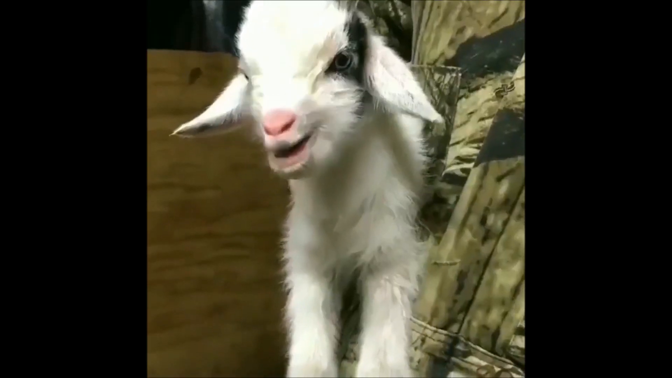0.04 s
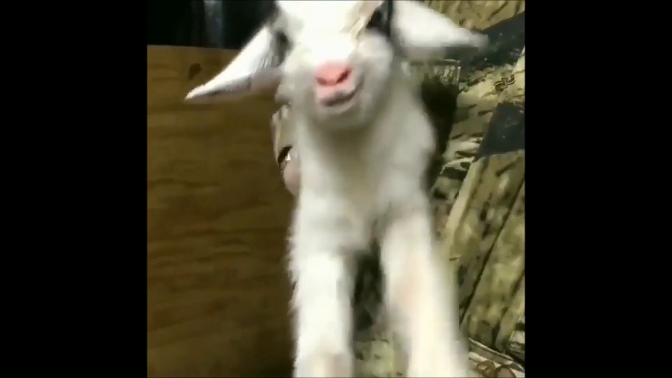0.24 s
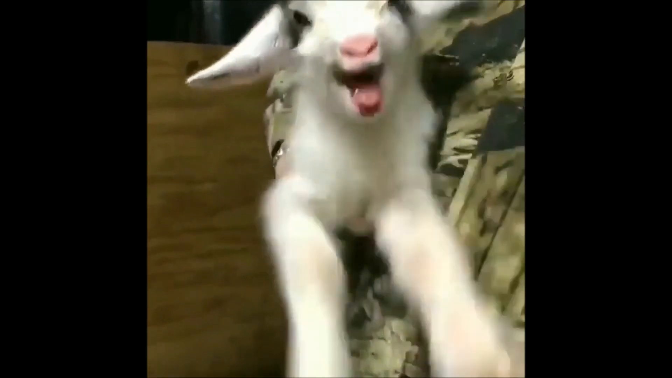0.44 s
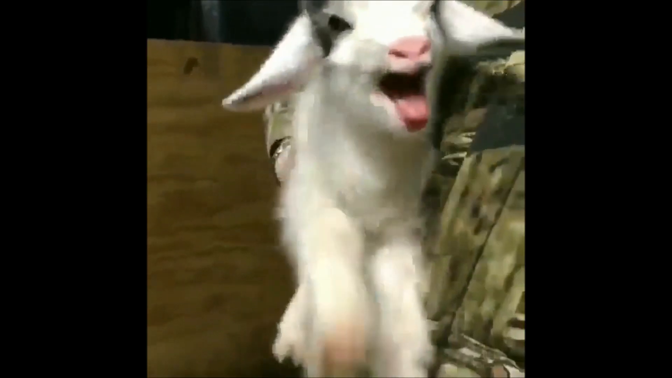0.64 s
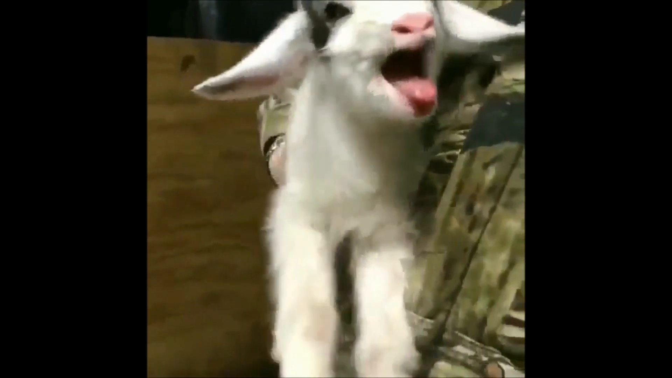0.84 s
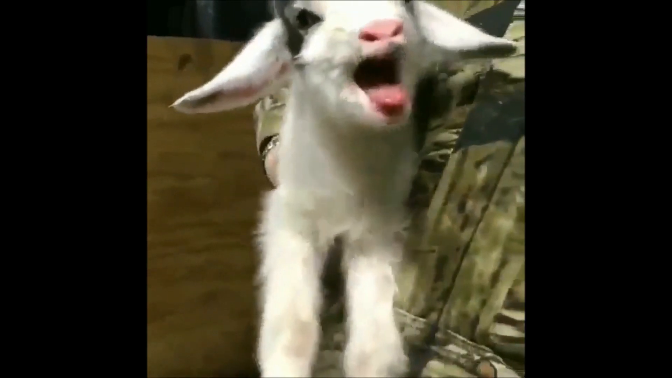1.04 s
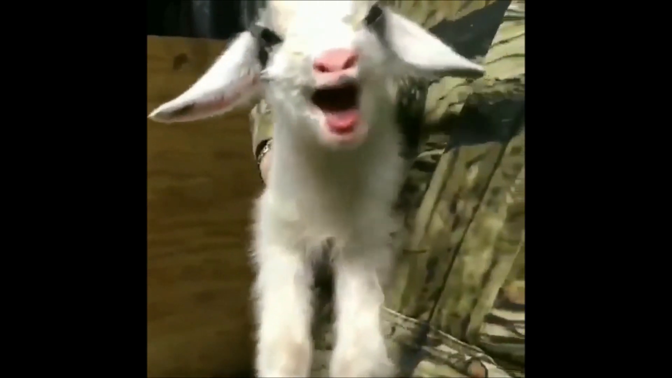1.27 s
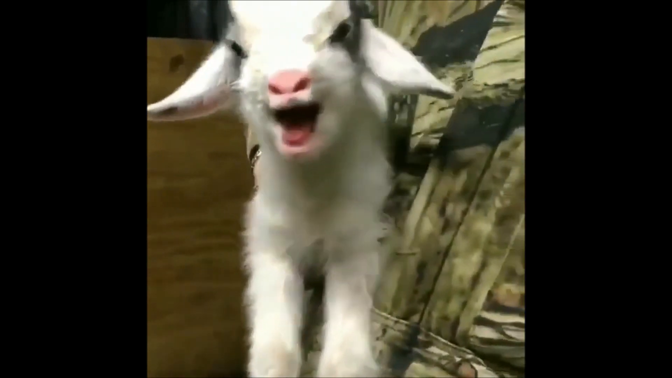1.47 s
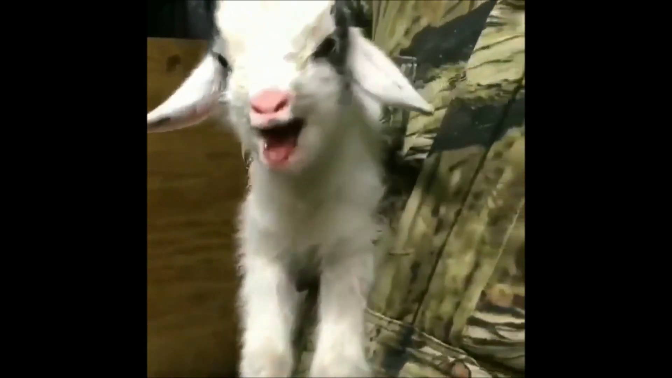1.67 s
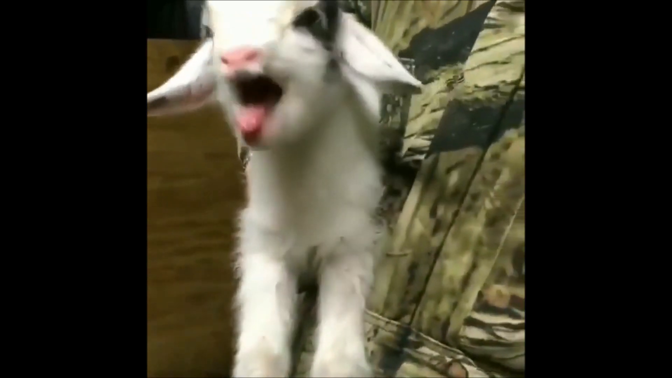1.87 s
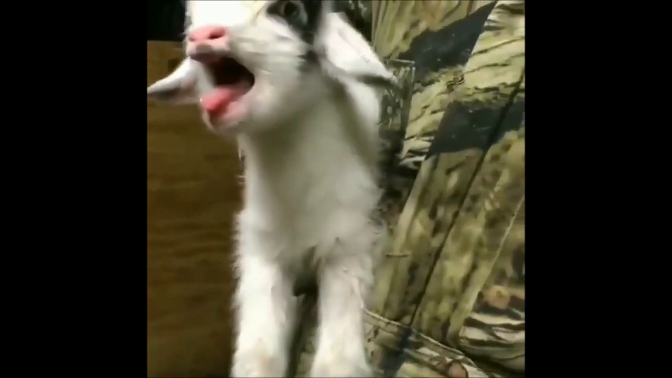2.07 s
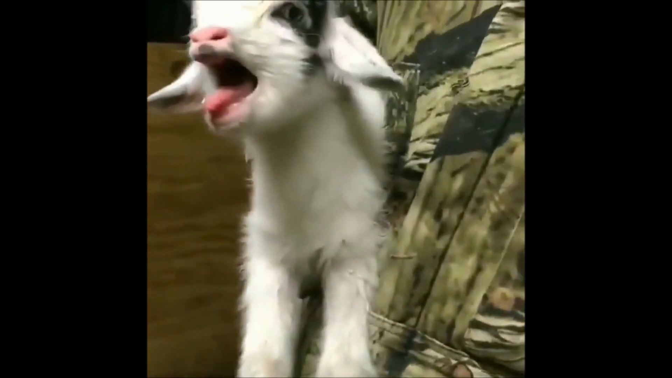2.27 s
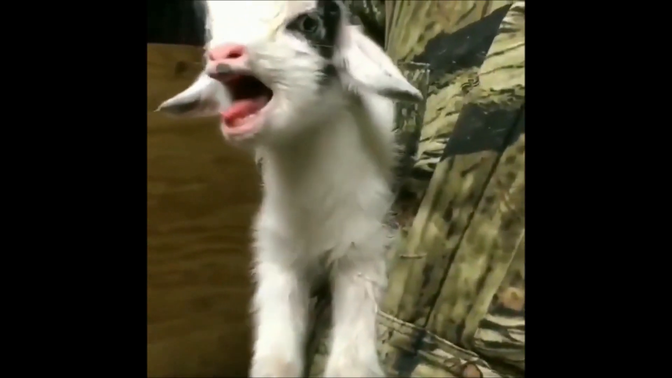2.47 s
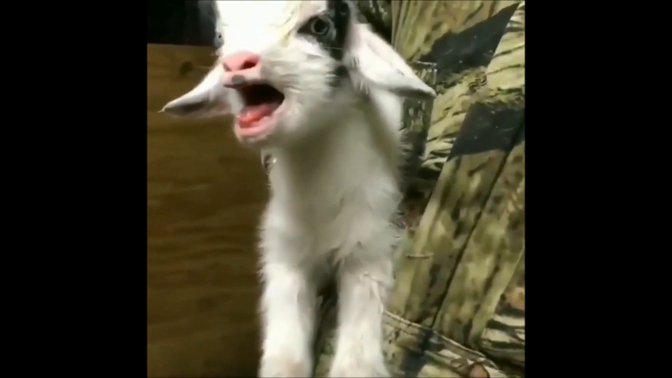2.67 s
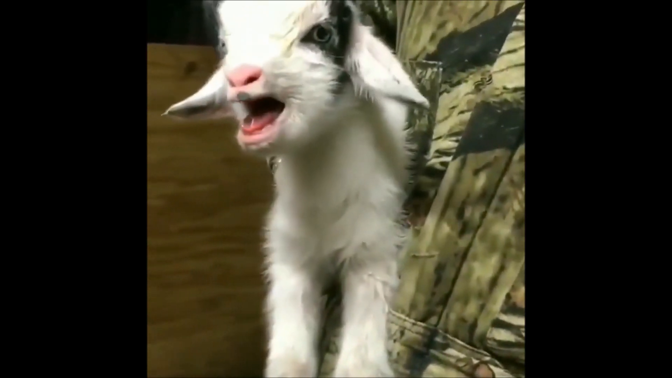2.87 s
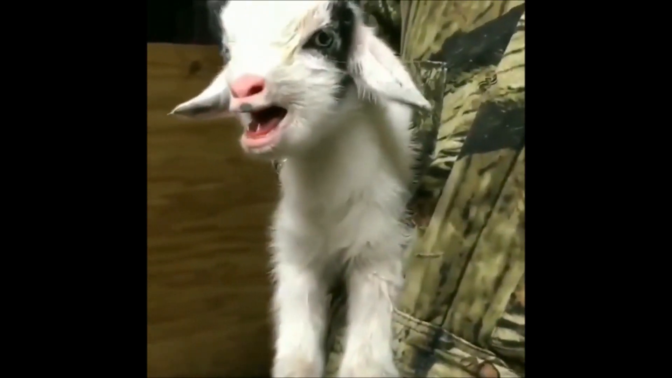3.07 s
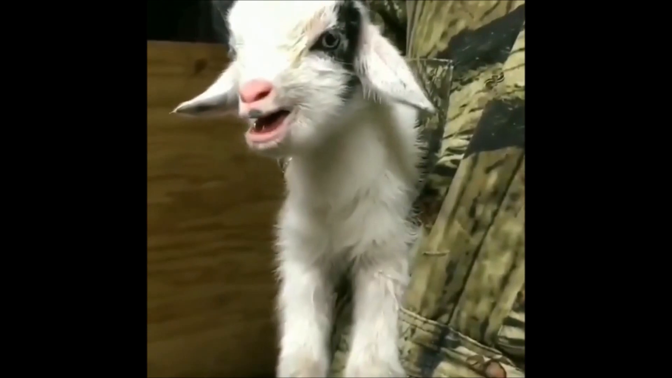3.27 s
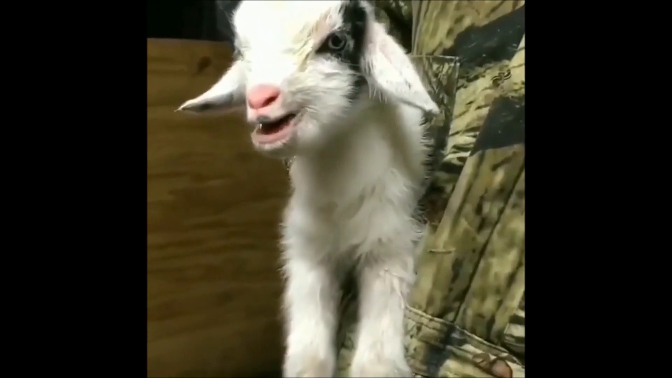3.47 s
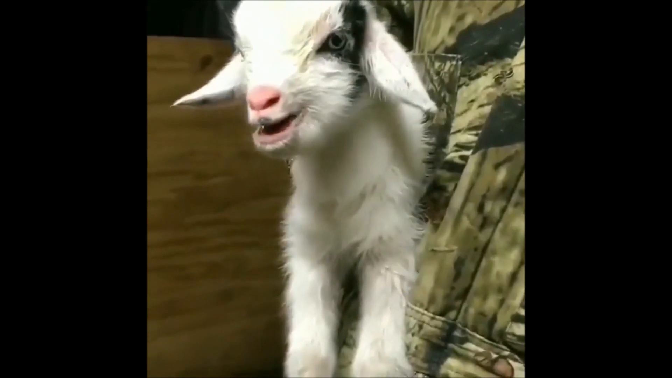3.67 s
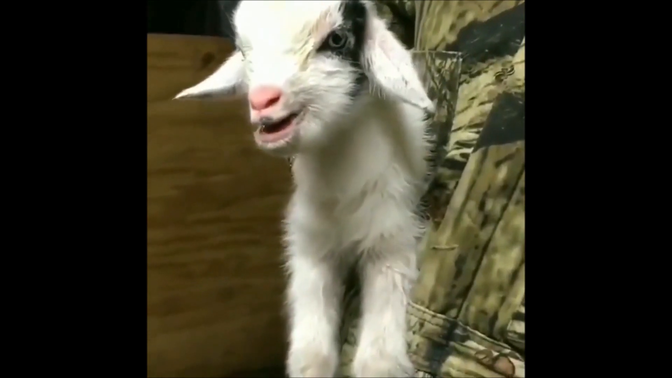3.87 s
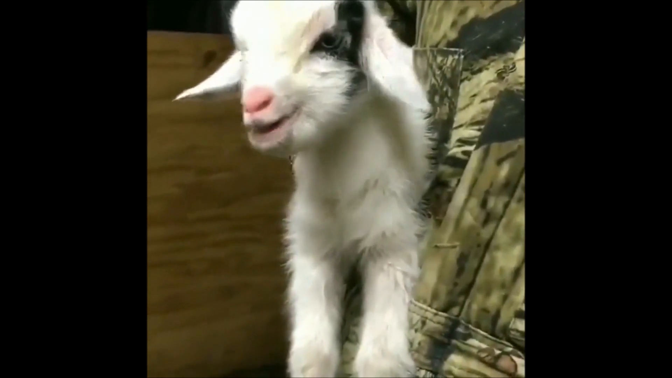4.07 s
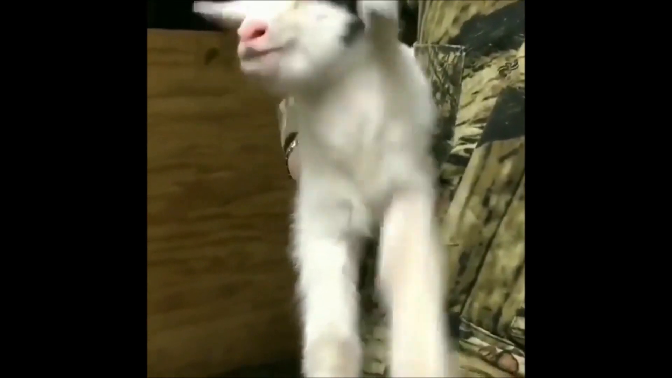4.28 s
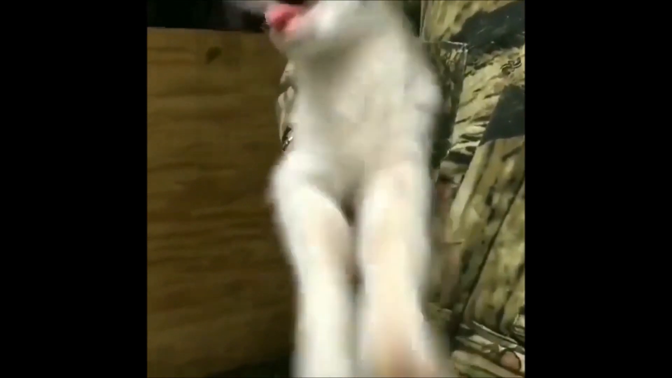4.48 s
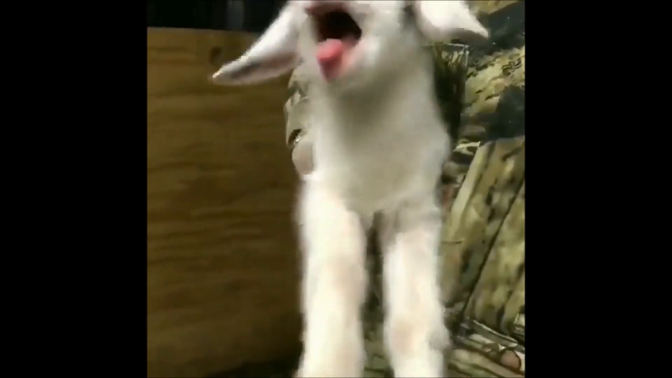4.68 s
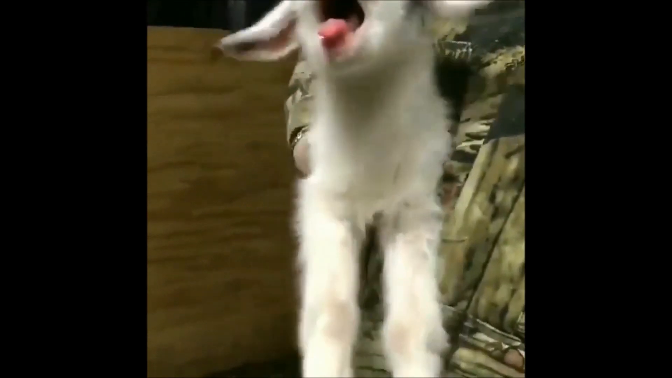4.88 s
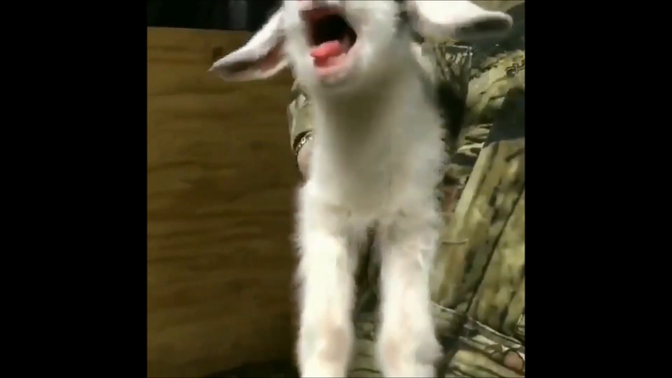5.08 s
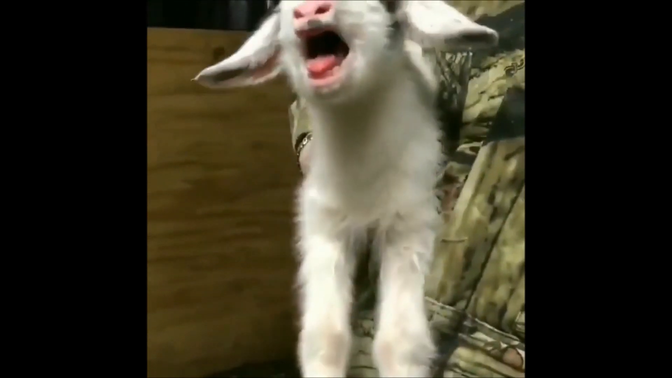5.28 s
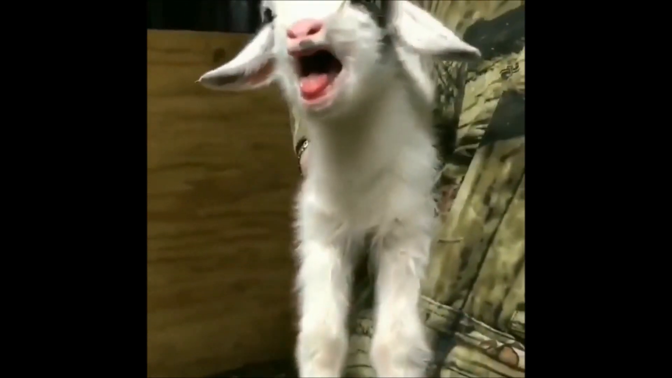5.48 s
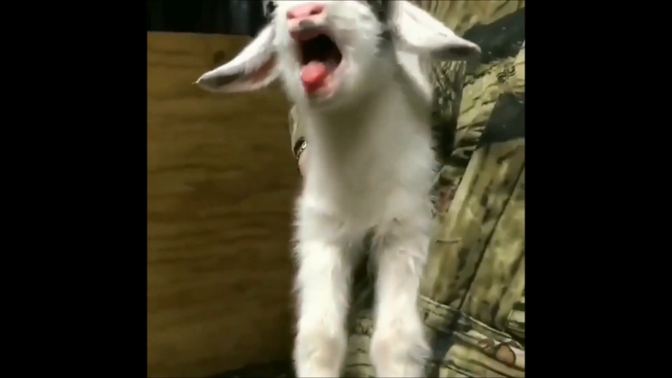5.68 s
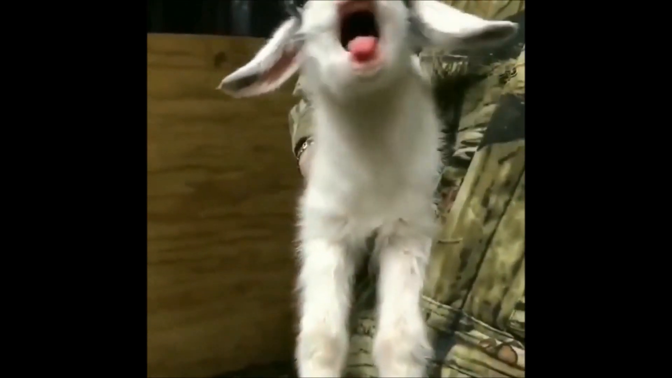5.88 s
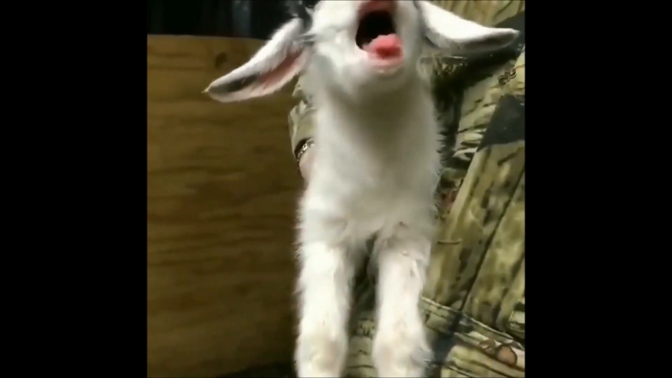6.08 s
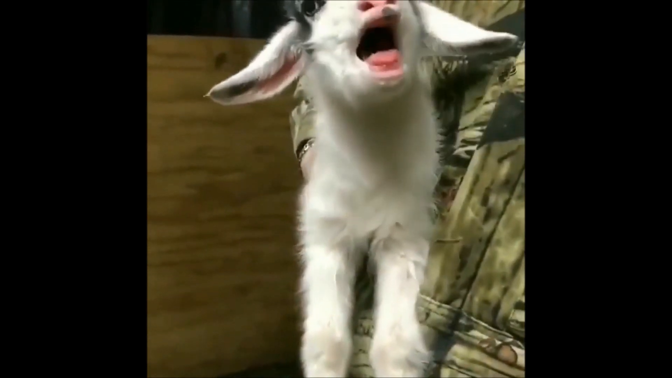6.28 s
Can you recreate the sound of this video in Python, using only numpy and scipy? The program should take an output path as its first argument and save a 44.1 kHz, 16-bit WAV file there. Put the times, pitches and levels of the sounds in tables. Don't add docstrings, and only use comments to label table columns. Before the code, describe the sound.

A young goat, very close to a phone microphone in a small wooden shed, bleats loudly twice about a second apart, pauses for two seconds, then bleats twice more. The cries are high, nasal and raspy, bursting open and cut off quickly. Between them come a soft grunt, a wet lip smack, faint air and rustling, over low wind and hiss.

```python
import sys
import numpy as np
from scipy import signal
from scipy.io import wavfile
from scipy.ndimage import uniform_filter1d

SR = 44100
rng = np.random.default_rng(int(sys.argv[2]) if len(sys.argv) > 2 else 0)


def unload_wav(signal):
    wavfile.write(
        sys.argv[1],
        SR,
        np.round(np.clip(np.atleast_2d(signal).T, -1, 1) * 32767).astype(np.int16),
    )


def voltage_ratio(level):
    return 10 ** (np.asarray(level, float) / 20)


N = 279192

# (time [s], pitch [Hz])
PITCH = [
    [(.405, 602.6), (.424, 640), (.44, 722.3), (.455, 724), (.526, 703), (.7, 735.2), (.9, 700),
     (1.026, 673.4), (1.06, 595.2)],
    [(1.68, 539.8), (1.732, 666.6), (1.79, 717.6), (1.85, 685.6), (1.93, 741.1), (2.078, 725.7),
     (2.256, 660.5), (2.33, 655.2), (2.395, 552)],
    [(4.37, 547.4), (4.39, 617), (4.436, 713.5), (4.518, 700), (4.628, 747.4), (4.828, 712), (4.96, 658.8),
     (4.984, 612.7), (5.0, 590)],
    [(5.405, 707.4), (5.416, 664), (5.534, 720.2), (5.582, 730), (5.608, 668.5), (5.68, 703.3),
     (5.796, 695), (6.06, 655), (6.1, 579.4)],
]
# (start [s], mouth opens [s], end [s], effort [dB], thin lead-in level [dB])
BLEATS = [
    (0.405, 0.423, 1.065, -11.5, -37),
    (1.678, 1.69, 2.3987, -12.5, -29.5),
    (4.369, 4.405, 4.994, -11, -46.5),
    (5.403, 5.556, 6.098, -12.5, -45.5),
]
VOICES = [
    (.011, .003, .011, 1.8, 0.36),
    (0.0074, .003, 0.014, 1.3, 0.7),
    (0.0018, .004, .011, 1.2, .35),
    (0.012, 0.011, 0.021, 0.64, .15),
]
# (jaw at opening [factor], tongue at opening [factor], brightness early [dB/octave],
# late [dB/octave], with shut lips [dB/octave])
MOUTHS = [
    (1.05, .74, -0.5, 3.4, -5),
    (1.08, 1.2, 2, 1.8, -6),
    (0.98, .7, -1, 5.1, -5),
    (1.0, 1.08, 2.5, 3.1, -14),
]
ROUND_DB = [7, -3, 7, 2]
STATIONS = [0.35, 0.36, 0.96]
# (frequency [Hz], width [Hz], level [dB])
THROAT = [(1339, 730, -7.5), (2190, 200, 5.5), (2900, 1400, -11.5), (4840, 390, 4), (6885, 1200, 2),
          (8450, 780, 1), (12000, 4100, -17)]
# (frequency [Hz], level [dB])
COLOUR = [(100, -58), (400, -40), (800, -17), (1250, -7), (2700, -1.5), (3500, -6), (4400, -3), (6000, -2),
          (9900, -10.5), (13400, -11), (13800, -56)]
# (time [s], dulling [dB/octave], drop of the fundamental [dB], length [s])
DIPS = [(.447, -1, -20, .006), (.637, -4, -15, .003), (.728, 0, -20, .004), (1.703, -4, 0, .005),
        (1.88, -2, 0, .004), (1.922, 0, -15, .004), (5.633, -2, 0, .005)]
# (time [s], pitch [Hz], level [dB])
GRUNT = [(0.0, 362, -56.5), (0.054, 400, -61), (0.094, 366, -71), (0.114, 376.7, -67), (0.13, 366, -82),
         (0.15, 368.7, -69)]
GRUNT_OVERTONES_DB = [8.5, -0.5, -19, -13]
# (time [s], peak level [dB])
SMACKS = [
    (1.6054, -43.5),
    (1.6208, -42.5),
]
# (frequency [Hz], level [dB], T60 [s])
LIPS = [(1460, -3, .05), (1770, 1.5, .05), (2290, -2.5, .05), (2720, -1.5, .04), (3300, -.6, .06),
        (7200, -6.5, .05), (5600, -9, .02)]
# (start [s], length [s], frequency [Hz], width [Hz], level [dB])
EXHALE = (3.0, .47, 1400, 350, -66)
# (start [s], length [s], level at the end [dB])
NOISE_SWELLS = [(0.136, .26, -70.5), (1.192, .27, -60), (1.474, 0.13, -68.5), (2.507, .28, -62.5),
                (2.956, .08, -64), (3.069, .3, -68), (3.401, .2, -65), (3.599, 1, -73), (5.122, .27, -61),
                (6.19, .13, -64.5)]
# (frequency [Hz], level [dB per Hz])
SWELL_TONE = [(180, -37), (300, -51), (352, -26.5), (532, 5), (614, 5), (665, -14), (1380, 1.5),
              (13500, -11.5)]
# (frequency [Hz], T60 [s])
SHED = [(500, 0.22), (1500, 0.26), (2300, 0.35), (3300, 0.3), (4700, .32), (10000, 0.34)]
# (time [s], rise [dB], length [s])
GUSTS = [(1.55, -0.5, .12), (3.0, 5.5, 0.13), (3.49, 11, .05), (4.25, 1.5, 0.19), (5.49, 2.5, 0.066),
         (6.278, 6, 0.034)]
# (frequency [Hz], level [dB per Hz])
RUMBLE_LOW = [(30, -22), (48, -3.5), (76, 3.5), (200, -13), (235, -15), (500, -25.5), (650, -57.5),
              (1100, -120)]
# (frequency [Hz], level [dB per Hz])
MICROPHONE_HISS = [(150, -33.5), (250, -5), (343, -8.5), (434, -15.5), (728, -14), (1490, -18.5),
                   (1650, -27), (2810, -24), (4130, -30.5), (13500, -31.5)]
# (frequency [Hz], level [dB])
HUM = [(59.2, -62.5)]

LEAD_DB_PER_S, LEAD_RISE_S = 89.5, 0.0039
ATTACK_DB, ATTACK_S, SWELL_DB, SWELL_S = -15.5, 0.021, -6.5, 0.035
SAG_DB, RELEASE_DB, RELEASE_S, CUT_S = -3, -7, 0.085, 0.0095
ONSET_S, BREATH_HOLD, BREATH_LATE, BREATH_END, BREATH_DIP = .04, .018, .04, .15, .05
AIR_HZ, AIR_TILT = 4230, 0.59
CHEST_DB, CHEST_SHARE, CHEST_SAG_DB = -38, 0.49, -2.5
CLOSING_DB, CLOSING_S, SHUT_S, ROUND_S = -12, 0.031, 0.015, .07
JAW, JAW_S, TONGUE_S, TONGUE_HZ, TONGUE_FOLLOW = 1.029, .035, .085, 700, 0.38
FLUTTER_DB = 3
DIP_TREBLE_HZ, DIP_TREBLE_LOSS = 5600, .7
SWELL_RISE_DB = 6
SHED_DB, WALLS_DB, WALLS_T60, GATE_S, GATE_DB = -25, -8.5, .07, 0.15, -5.5
GUST_DB, GUST_SWAY_DB, DUCK_DB, HISS_DB = -58, 0.5, -2.5, -66


def bleat(pitch, cry, voice_row, mouth_row, round_db):
    t = np.arange(cry[0], cry[0] + 1, 1 / SR)
    effort, *timing = shape(t, *cry)
    progress = timing[0]
    bright_db, low_tuning, tongue = mouth(*timing, *mouth_row)
    hz = uniform_filter1d(follow(pitch, t)[0], size=500)
    high_tuning = tongue * (hz / TONGUE_HZ) ** TONGUE_FOLLOW

    dip = np.array([np.exp(-((t - row[0]) / row[3]) ** 2) for row in DIPS])
    dull_db, drop_db = np.transpose(DIPS)[1:3] @ dip
    bright_db = bright_db + dull_db
    chest_db = CHEST_DB + CHEST_SAG_DB * progress + drop_db
    chest = voltage_ratio(chest_db) * (effort / effort.max()) ** CHEST_SHARE

    *alternation, onset_breath = voice_row
    onset = np.exp(-((t - cry[1]) / ONSET_S) ** 2)
    breath = BREATH_HOLD + BREATH_LATE * progress ** 2 + BREATH_END * progress ** 20
    breath += onset_breath * onset + BREATH_DIP * uniform_filter1d(dip.sum(0), size=600)
    cycles, pulses, puffs = folds(t - cry[0], hz, progress, breath, *alternation)
    voice = throat(pulses, puffs, breath, bright_db, low_tuning, high_tuning, timing[1], round_db)
    voice = signal.oaconvolve(voice, colour(COLOUR), "same")
    voice /= np.sqrt(abs(uniform_filter1d(voice ** 2, size=1500)) + 1e-12)
    return t[0], effort * voice + np.sqrt(2) * chest * np.sin(2 * np.pi * cycles)


def folds(since_start, hz, progress, breath, early, midway, late, steady_share):
    wobble, sway, swing, air = rng.standard_normal((len(hz), 4)).T
    sway, swing = drift(sway, 130), drift(swing, 130)
    unevenness = np.interp(progress, STATIONS, [early, midway, late])
    wandering = np.clip(unevenness * np.clip(since_start / .12, 0, 1), 0, .025)
    cycles = np.cumsum(hz) / SR
    uneven = wandering * (steady_share + sway) * np.cos(np.pi * cycles)
    uneven += wandering * swing * np.sin(np.pi * cycles)
    cycles += uneven + .025 * breath * evened(uniform_filter1d(wobble, size=80))
    snap = sum(np.cos(2 * np.pi * k * cycles - .008 * k * k) for k in range(1, 25))
    pulses = (1 + 3.0 * uneven) * snap
    puffs = (0.57 + np.exp(-(cycles % 1) / .25)) * air
    return cycles, evened(pulses), evened(puffs)


def throat(pulses, puffs, breath, bright_db, low_tuning, high_tuning, since, round_db):
    tremble = rng.standard_normal((len(THROAT), len(pulses)))
    flutter = drift(tremble, 1300)
    rounding_db = round_db * np.exp(-(since / ROUND_S) ** 2)
    out = np.zeros(len(pulses))
    for k, (mode_hz, width, db) in enumerate(THROAT):
        tuning = low_tuning if k < 3 else high_tuning ** (1 if k == 3 else .25)
        gain_db = db + bright_db * np.log2(mode_hz / 2200) + FLUTTER_DB * flutter[k]
        if k == 0:
            gain_db = gain_db + rounding_db
        share = np.clip(breath * (mode_hz / AIR_HZ) ** AIR_TILT, 0, 1)
        air = 2.6 * resonate(puffs, mode_hz * tuning, 1.1 * width)
        drive = (1 - share) * pulses + share * air
        out += voltage_ratio(gain_db) * resonate(drive, mode_hz * tuning, width)
    return out


def shape(t, start, opens, end, effort_db, lead_db):
    since, left = np.maximum(t - opens, 0), np.maximum(end - t, 0)
    progress = np.clip(since / (end - opens), 0, 1)
    shut = np.exp(-since / ATTACK_S)
    lead = voltage_ratio(lead_db + LEAD_DB_PER_S * (np.minimum(t, opens) - start)) * shut
    full_db = effort_db + ATTACK_DB * shut + SWELL_DB * np.exp(-since / SWELL_S)
    full_db += SAG_DB * progress ** 2 + RELEASE_DB * np.exp(-left / RELEASE_S)
    full = voltage_ratio(full_db) * np.clip(since / LEAD_RISE_S, 0, 1)
    edges = np.clip((t - start) / LEAD_RISE_S, 0, 1) * np.clip(left / CUT_S, 0, 1)
    return (lead + full) * edges, progress, since, left


def mouth(progress, since, left, jaw, tongue, early_db, late_db, shut_db):
    bright_db = early_db + (late_db - early_db) * progress
    bright_db += shut_db * np.exp(-since / SHUT_S) + CLOSING_DB * np.exp(-left / CLOSING_S)
    jaw_tuning = JAW + (jaw - JAW) * np.exp(-since / JAW_S)
    tongue_tuning = 1 + (tongue - 1) * np.exp(-(since / TONGUE_S) ** 2)
    return bright_db, jaw_tuning, tongue_tuning


def treble_dipped(x):
    t = np.arange(N) / SR
    high_pass = signal.firwin(101, DIP_TREBLE_HZ, pass_zero=False, fs=SR)
    treble = signal.oaconvolve(x, high_pass, "same")
    dips = sum(np.exp(-((t - row[0]) / row[3]) ** 4) for row in DIPS)
    return x - DIP_TREBLE_LOSS * treble * dips


def grunt():
    t = np.arange(0, GRUNT[-1][0], 1 / SR)
    hz, level_db = follow(GRUNT, t)
    phase = 2 * np.pi * np.cumsum(hz) / SR
    tone = sum(voltage_ratio(db) * np.sin((k + 1) * phase) for k, db in enumerate(GRUNT_OVERTONES_DB))
    return voltage_ratio(level_db - 4.0) * tone * np.clip((t[-1] - t) / .02, 0, 1)


def smack(db):
    t = np.arange(2000) / SR
    ring = sum(voltage_ratio(level_db - 60 * t / t60) * np.sin(2 * np.pi * hz * t) for hz, level_db, t60 in LIPS)
    sputter = rng.standard_normal(400) * np.hanning(400)
    ring = np.convolve(ring, sputter)
    return voltage_ratio(db) * ring / abs(ring).max()


def exhale(start, length, hz, width, db):
    t = np.arange(0, length, 1 / SR)
    tune = np.full(len(t), hz)
    air = resonate(rng.standard_normal(len(t)), tune, width)
    air = resonate(air, tune, width)
    return start, voltage_ratio(db) * evened(air) * np.sqrt(np.sin(np.pi * t / length))


def noise_swells():
    t = np.arange(N) / SR
    level = np.zeros(N)
    for s, length, db in NOISE_SWELLS:
        swell_db = SWELL_RISE_DB * ((t - s) / length - 1).clip(-1, 0)
        level += voltage_ratio(db + swell_db) * (t >= s) * (t < s + length)
    return hiss(SWELL_TONE, patchy_db=2.0) * uniform_filter1d(level, size=300)


def echo(x, decays):
    taps, at = np.zeros(SR // 2), np.arange(100, SR // 2 - 20, 20)
    taps[at + rng.integers(0, 20, len(at))] = rng.choice([-1., 1.], len(at))
    hz, t, z = signal.stft(taps, SR, nperseg=256)
    decay = voltage_ratio(-60 * t / read(decays, hz)[:, None])
    tail = signal.istft(z * decay, SR, nperseg=256)[1]
    return signal.fftconvolve(x, tail / np.linalg.norm(tail))[:N]


def rumble():
    t = np.arange(N) / SR
    waver, sway = (evened(uniform_filter1d(v, size=4000)) for v in rng.standard_normal((N, 2)).T)
    hum = sum(voltage_ratio(db + 2.5 + 2.5 * waver) * np.sin(2 * np.pi * hz * t) for hz, db in HUM)
    crying = sum(1. * (t > row[1]) * (t < row[2]) for row in BLEATS)
    crying = uniform_filter1d(crying, size=4000)
    gust_db = GUST_DB + GUST_SWAY_DB * sway + DUCK_DB * crying
    gust_db += sum(db * np.exp(-((t - s) / length) ** 2) for s, db, length in GUSTS)
    gusts = voltage_ratio(gust_db) * hiss(RUMBLE_LOW, patchy_db=2.0)
    return gusts + voltage_ratio(HISS_DB) * hiss(MICROPHONE_HISS, patchy_db=1.5) + hum


def hiss(points, patchy_db):
    a, b, patches = rng.standard_normal((N // 256 + 5, 513, 3)).T
    patches = uniform_filter1d(patches, size=10, axis=0)
    patches = evened(uniform_filter1d(patches, size=12, axis=1))
    level_db = read(points, np.fft.rfftfreq(1024, 1 / SR))[:, None] + patchy_db * patches
    noise = signal.istft((a + 1j * b) * voltage_ratio(level_db), nperseg=1024, noverlap=768)[1]
    return evened(noise[:N])


def resonate(x, hz, width):
    turn = np.exp(2j * np.pi * np.cumsum(hz) / SR)
    r = np.exp(-np.pi * width / SR)
    return 2 * (turn * signal.lfilter([1 - r], [1, -r], x / turn)).real


def colour(points):
    hz = np.linspace(0, SR / 2, 1025)
    return signal.firwin2(1023, hz, voltage_ratio(read(points, hz)), fs=SR)


def evened(x):
    return x / np.sqrt(np.mean(x ** 2) + 1e-20)


def drift(x, size):
    return evened(uniform_filter1d(uniform_filter1d(x, size=size), size=size))


def read(points, hz):
    f, value = np.transpose(points)
    return np.interp(np.log(hz + 1), np.log(f + 1), value)


def follow(rows, t):
    s, *columns = np.transpose(rows)
    return [np.interp(t, s, c) for c in columns]


def add(mix, s, sound):
    part = mix[round(s * SR):][:len(sound)]
    part += sound[:len(part)]


def scene():
    kid, t = np.zeros(N), np.arange(N) / SR
    for rows in zip(PITCH, BLEATS, VOICES, MOUTHS, ROUND_DB):
        add(kid, *bleat(*rows))
    add(kid, 0, grunt())
    for s, db in SMACKS:
        add(kid, s, smack(db))
    room = voltage_ratio(WALLS_DB) * echo(kid, [(1000, WALLS_T60)]) + voltage_ratio(SHED_DB) * echo(kid, SHED)
    gated = sum(1. * (t > row[2] + GATE_S) * (t < row[2] + 2 * GATE_S + .1) for row in BLEATS)
    room *= voltage_ratio(GATE_DB * uniform_filter1d(gated, size=500))
    add(kid, *exhale(*EXHALE))
    mix = treble_dipped(kid + room) + noise_swells() + rumble()
    return np.array([mix, mix])


def top_cut(x):
    return signal.sosfilt(signal.butter(12, 13750, fs=SR, output="sos"), x)


def record(dry):
    saturated = 0.96 * dry / (1 + dry ** 8) ** (1 / 8)
    return top_cut(np.clip(saturated, -1, 1))


dry = scene()
out = record(dry)
unload_wav(out)
```